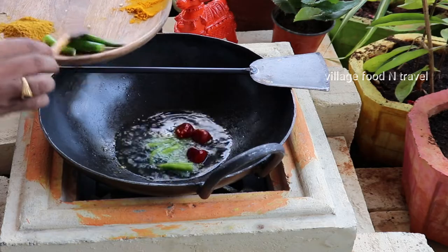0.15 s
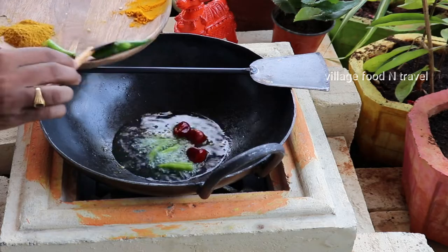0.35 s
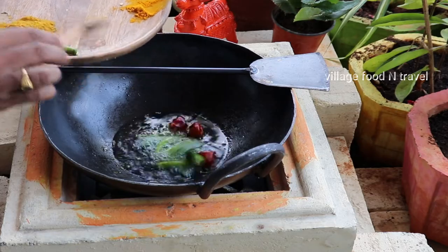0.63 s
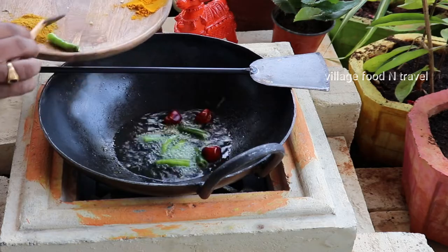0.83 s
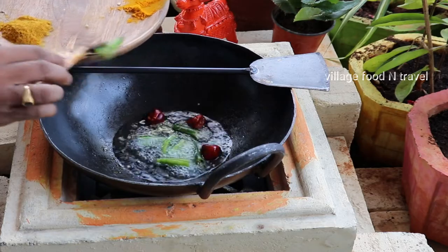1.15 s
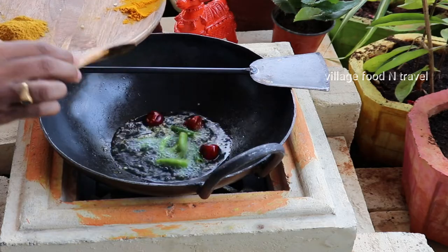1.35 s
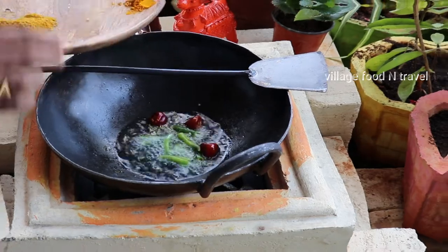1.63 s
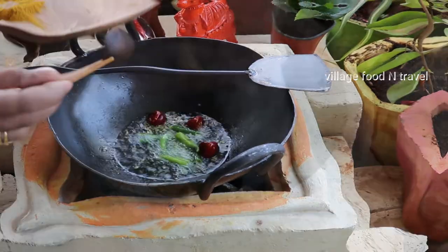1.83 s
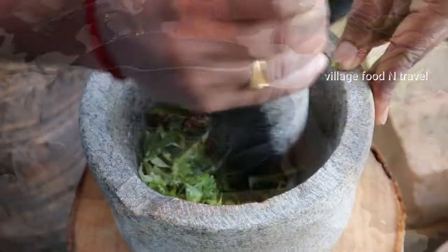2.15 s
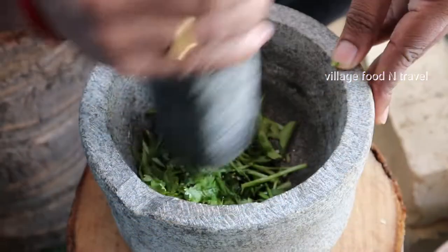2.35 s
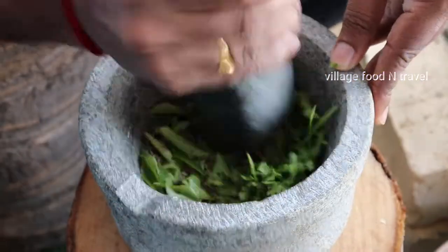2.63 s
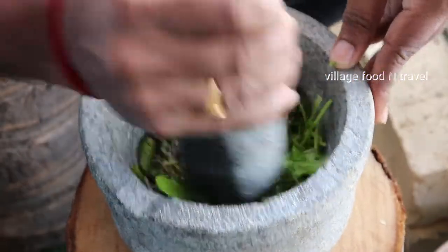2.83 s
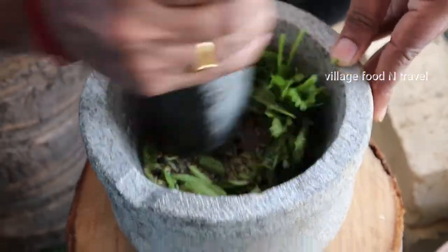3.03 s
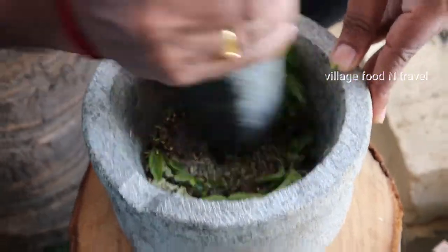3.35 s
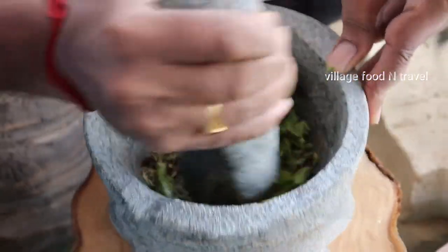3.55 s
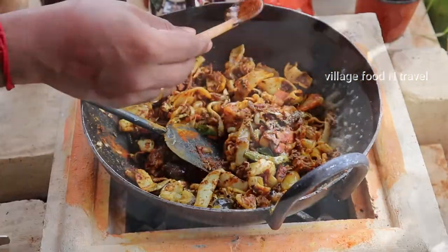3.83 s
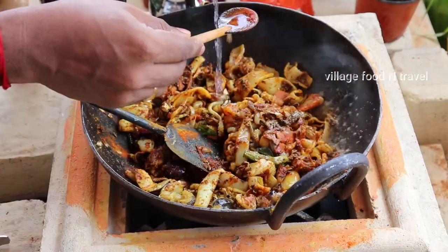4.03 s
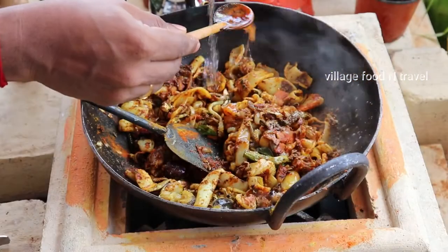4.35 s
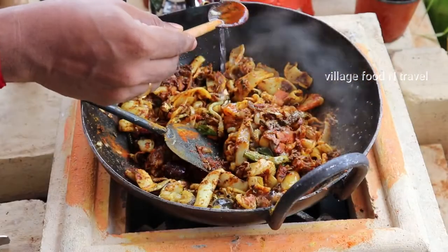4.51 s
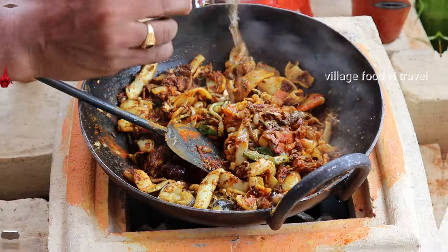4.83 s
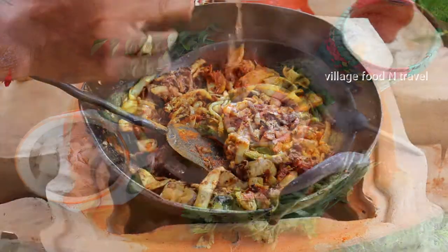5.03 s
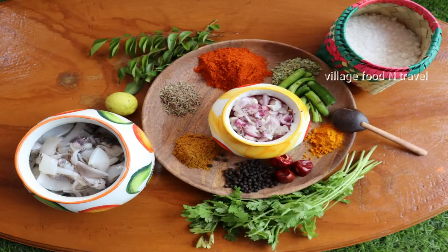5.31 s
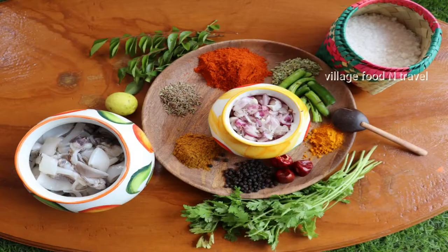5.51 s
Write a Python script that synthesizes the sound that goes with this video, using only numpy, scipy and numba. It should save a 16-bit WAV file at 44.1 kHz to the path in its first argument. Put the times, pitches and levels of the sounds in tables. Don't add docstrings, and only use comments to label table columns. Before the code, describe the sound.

Sharp oil spits over a fine sizzle, two wooden taps and short scrapes, with a low uneven engine far away. Around two seconds frying fades under regular mortar blows about every quarter to four tenths of a second, with leafy crunches, snaps and ringing stone. A loud, steady steaming hiss swells from a wet pan, then stops. Outdoor yard, light wind, close microphone overloading on the hardest hits.

```python
import sys
import numpy as np
from scipy import signal
from scipy.fft import rfft, irfft, next_fast_len
from scipy.io import wavfile
from numba import njit

SR = 44100
rng = np.random.default_rng(int(sys.argv[2]) if len(sys.argv) > 2 else 0)


def invert_db(x):
    u = np.asarray(x, float) / 20
    return 10 ** u


def output_pcm(signal):
    pcm = np.clip(np.atleast_2d(signal).T, -1, 1) * 32767
    wavfile.write(sys.argv[1], SR, np.round(pcm).astype(np.int16))


N = 250124
T = np.arange(N) / SR
FFT_N = next_fast_len(N)
HZ = np.maximum(np.fft.rfftfreq(FFT_N, 1 / SR), 1)
OCTAVES = [np.cos(np.pi / 2 * np.clip(np.log2(HZ / (30 * 2 ** k)), -1, 1)) ** 2 for k in range(10)]

# fade-in start in seconds, fade-out end in seconds.
PAN_SHOT, MORTAR_SHOT, STEAM_SHOT = (-1, 2.37), (1.8, 4.0), (3.6, 5.3245)
FRAME_S, DISSOLVE_S, DISSOLVE_POWER = 1 / 24, 0.42, 1.59
RING_S = .35
CALM_DB = 1.6

# frequency in Hz, side minus mid in dB.
SIDES = [(60, -13.5), (110, -11.5), (200, -10.5), (380, -12.5), (700, -10.5), (1290, -7), (2380, -6.5),
         (4400, -8), (8120, -4), (15000, -1)]

# start in seconds, length in seconds, level in dB.
GUSTS = [(1.865, 0.027, -43.5), (2.056, 0.079, -41), (2.204, 0.036, -42.5), (2.29, 0.41, -42),
         (2.932, 0.056, -47), (3.12, 0.013, -47), (3.4, 0.11, -53), (4.74, .04, -64)]

# time in seconds, level in dB.
ENGINE_LOAD = [
    (0.0, -40),
    (1.03, -33.5),
    (1.38, -35),
    (1.6, -32.5),
    (2.4, -60.5),
]
# frequency in Hz, width in Hz, level in dB.
EXHAUST = [(169.7, 35, 1), (287.2, 7.5, -12)]
# frequency in Hz, width in Hz, level in dB.
SILENCER = [(126.3, 29.5, -1.5)]

# start in seconds, length in seconds,
# level in dB, pitch in Hz.
HUMS = [(1.178, .012, -30, 960), (1.79, .02, -38.5, 298), (3.638, .015, -38, 900),
        (1.452, 0.019, -37.5, 680), (3.054, 0.015, -37.5, 700), (3.275, 0.068, -38.5, 477),
        (3.594, 0.19, -47, 388), (3.87, .025, -43, 545)]

# start in seconds, length in seconds, level in dB.
RUSTLES = [(2.263, 0.08, -47.5), (2.516, 0.018, -33), (2.599, 0.036, -26.5), (2.667, 0.089, -37),
           (2.813, 0.056, -33.5), (2.894, 0.028, -42.5), (2.938, 0.017, -32), (2.978, 0.044, -33.5),
           (3.043, 0.022, -34), (3.108, 0.012, -35.5), (3.173, 0.073, -40), (3.263, 0.051, -35.5),
           (3.357, 0.0091, -33), (3.394, 0.067, -40.5), (3.448, 0.056, -34.5), (3.531, 0.18, -40.5)]
# frequency in Hz, density in dB per Hz.
LEAF_COLOUR = [(1000, -14), (1800, -9), (2600, -4), (4500, -0.5), (7000, -5), (10000, -9), (15800, -26)]
# time in seconds, peak in dB, pitch in Hz.
SNAPS = [(2.6564, -17, 4000), (2.7165, -17, 4380), (2.953, -18, 4785), (3.001, -19, 3220),
         (3.054, -23, 5000), (3.0656, -23.5, 5000), (3.4775, -19.5, 2800), (3.4616, -15.5, 3570),
         (3.4694, -17, 4180), (2.8, -22, 4800), (3.4015, -24.5, 4070), (2.5884, -19.5, 3800),
         (3.6, -27, 4000), (3.4394, -24, 3100), (2.8, -18.5, 4230)]
# time in seconds, peak in dB, pitch in Hz.
SEEDS = [
    (2.1585, -22.5, 980),
    (3.4601, -21, 800),
]
# time in seconds, peak in dB, pitch in Hz.
LEAF_TICKS = [(2.7504, -27, 8500), (2.8185, -27, 9810), (3.0097, -31, 8500), (3.1168, -26, 9190),
              (3.1224, -28, 9040), (3.3024, -33, 8450), (3.4935, -24.5, 8300)]

# time in seconds, peak in dB.
TAPS = [
    (0.211, -17),
    (0.533, -13.5),
]
# start in seconds, length in seconds, level in dB.
SCRAPES = [(1.042, 0.013, -31.5), (1.065, 0.046, -36), (1.117, .01, -33.5), (1.159, .042, -30),
           (1.223, .018, -36), (1.279, .008, -32), (1.298, 0.012, -29.5)]
# start in seconds, length in seconds, level in dB.
SKIDS = [(0.242, .055, -37), (0.54, .045, -40.5), (1.035, .03, -34), (1.172, .03, -32),
         (1.273, .045, -32.5)]
# frequency in Hz, level in dB, t60 in seconds.
PLATE = [(872, 0, .085), (950, -7, .07), (1490, -7, .1), (1771, -7, .12), (1880, -5, .18), (2008, -9, .18),
         (2580, -7, .14), (2800, -9, .09)]

# time in seconds, level in dB.
OIL = [(0, -30.5), (.09, -33.5), (.17, -36.5), (.26, -34), (.33, -35.5), (.45, -33), (.58, -29), (.66, -30),
       (.79, -31), (.87, -27.5), (.98, -28), (1.1, -30), (1.25, -28.5), (1.32, -28), (1.5, -29.5),
       (1.76, -30.5), (2.07, -33), (2.4, -36)]
# frequency in Hz, density in dB per Hz.
OIL_COLOUR = [(240, -39), (400, -7.5), (654, -3.5), (729, -8), (1070, -6), (2310, -4.5), (2950, 0),
              (4980, 2), (9080, -4.5), (15800, -21)]
# time in seconds, peak in dB, pitch in Hz.
TICKS = [(0.1088, -8, 8000), (0.2124, -7, 2060), (0.2324, -10, 5900), (0.4657, -10, 2090),
         (0.5342, -2, 2800), (0.8778, -1, 3350), (0.8978, -4.5, 3860), (0.9325, -7, 3700),
         (1.0216, -6.5, 2920), (1.1273, -6, 5370), (1.3099, 0, 4000), (1.3155, 0, 4300), (1.6599, -6, 2500),
         (1.714, -5, 2400), (1.7449, -12.5, 3030), (1.8235, -3.5, 3800), (1.912, -10.5, 3230),
         (1.94, -8, 5340), (1.9889, -14, 4560), (2.0059, -16.5, 3500), (2.2044, -17, 2920)]
# time in seconds, peak in dB, pitch in Hz.
PINGS = [(0.0179, -6, 3220), (0.0282, -10, 4140), (0.5037, -9, 4680), (0.702, -7.5, 4580),
         (0.7107, -6, 3000), (0.752, -5.5, 6070), (0.8143, -2, 5030), (0.8647, -11.5, 4070),
         (1.052, -13.5, 2620), (1.2024, -6.5, 4730), (1.3704, -4.5, 5160), (1.4117, -7, 6300),
         (1.506, -4, 3950), (1.5343, -9, 7000), (1.5421, -9.5, 6800), (1.6157, -4, 3740),
         (1.6837, -13, 2820), (1.699, -7.5, 3900), (1.7774, -8.5, 3860), (1.7906, -5, 6400),
         (1.8951, -5, 4020), (1.9062, -10, 2900), (1.9314, -18.5, 2440), (1.964, -8, 3950),
         (2.0746, -10, 4020), (2.1021, -13.5, 4080), (2.1218, -17, 3500)]
# time in seconds, peak in dB, pitch in Hz.
SPLATS = [(0.0564, -9.5, 2040), (0.0614, -3, 4500), (0.3448, -9, 2360), (0.3505, -0.5, 4200),
          (0.4321, -4.5, 3370), (0.5706, -12, 3500), (0.5763, 2.5, 2210), (1.0696, -8.5, 6100),
          (1.2159, -2, 2980), (1.2898, -8.5, 2650), (1.4615, -8.5, 5130), (1.566, -10, 5000),
          (2.159, -16, 2800)]
# time in seconds, peak in dB, pitch in Hz.
SPITS = [(0.3264, -19, 7980), (0.3735, -26.5, 7560), (0.3812, -21.5, 7500), (0.6155, -17, 4490),
         (0.833, -7, 5110), (0.9712, -12.5, 3350), (1.1058, -24, 3596), (1.2706, -18.5, 2710),
         (1.6368, -13.5, 5270), (2.2463, -24, 5000)]
# time in seconds, peak in dB, pitch in Hz.
DOTS = [(.0688, -17, 4560), (.0755, -16.5, 4330), (.1405, -18.5, 2620), (.4718, -14, 1900),
        (.9854, -10, 7720), (1.1328, -10, 5200), (1.8577, -16.5, 4260), (2.1848, -25.5, 5850),
        (2.1955, -28, 2410), (.1189, -13.5, 6700), (.6646, -16, 3800), (.6705, -16.5, 2650),
        (.6875, -12, 3970), (.7756, -13, 4020), (.8844, -9, 5000), (.939, -11, 4240), (1.016, -7.5, 5980),
        (1.0735, -18, 3400), (1.0989, -13, 7100), (1.146, -16.5, 2280), (1.3055, -11.5, 4780),
        (1.3642, -8, 5480), (1.4071, -10.5, 6630), (1.4192, -13.5, 3830), (1.5009, -7, 4950),
        (1.5688, -10, 3170), (1.6245, -12, 3490), (1.65, -5, 6180), (1.746, -10, 4870),
        (1.7805, -7.5, 3080), (1.7971, -9.5, 3960), (1.9135, -8.5, 3290), (1.9966, -13.5, 4650),
        (2.1118, -16.5, 3800)]
# time in seconds, peak in dB, pitch in Hz.
SPARKS = [(0.0238, -31, 7500), (0.0238, -25.5, 8600), (0.0363, -22.5, 8490), (0.0752, -19.5, 9920),
          (0.1087, -22, 8200), (0.1585, -25.5, 7990), (0.2129, -32.5, 8420), (0.2244, -26.5, 7810),
          (0.2503, -30.5, 8940), (0.3062, -29, 10500), (0.3237, -27.5, 7910), (0.3336, -27.5, 7810),
          (0.35, -23, 8000), (0.4309, -16.5, 9960), (0.467, -19, 7530), (0.4978, -28.5, 8200),
          (0.5317, -24.5, 7580), (0.575, -16, 9700), (0.6155, -34, 7500), (0.6157, -16, 8590),
          (0.635, -21.5, 8920), (0.7013, -26.5, 11100), (0.7023, -26.5, 8440), (0.7093, -21.5, 8940),
          (0.7497, -23, 7500), (0.8327, -11.5, 9360), (0.9448, -22.5, 8700), (0.9847, -21.5, 7690),
          (1.0515, -27.5, 7610), (1.0854, -23, 8690), (1.1047, -16, 8730), (1.1463, -21, 7740),
          (1.1596, -16.5, 8460), (1.1977, -21.5, 9410), (1.2545, -22, 8650), (1.2715, -13, 8510),
          (1.3394, -25.5, 7540), (1.3912, -22, 7560), (1.4441, -21, 8770), (1.4965, -31.5, 9620),
          (1.4965, -20, 8090), (1.5404, -14.5, 8720), (1.5898, -25, 8510), (1.6297, -22.5, 8640),
          (1.6492, -25.5, 7910), (1.6816, -26, 7630), (1.7155, -26, 7730), (1.8238, -17, 8550),
          (1.8457, -28.5, 7980), (1.8692, -25, 8800), (1.9235, -23, 7760), (1.943, -22, 7790),
          (1.9889, -24, 8610), (2.0238, -18.5, 7770), (2.0842, -27.5, 8450), (2.1575, -21.5, 11000)]
# ring in cycles, bright crack in dB, low plop in dB.
TICK, PING, SPLAT = (1, -22, -39), (4.2, -15, -36.5), (1.3, -11, -3.5)
SPIT, SNAP = (1.1, -1.6, -16.5), (1.9, -16, -8)
DOT, SPARK = (1.8, -14, -30), (1.0, -29.5, -40)

# frequency in Hz, density in dB per Hz.
STEAM_COLOUR = [(120, 16), (200, -48), (366, -15.5), (423, -29.5), (455, -11.5), (668, -9.5), (848, -9),
                (1180, -2.5), (2080, 3.5), (2450, 10.5), (7600, -1.5), (12700, -14.5), (15800, -25)]
# frequency in Hz, width in Hz, lift in dB.
PAN = [(680, 14, 8.5), (1200, 110, 1), (1505, 35, 4), (1823, 13, 9.5), (2430, 690, -5.5)]
# start in seconds, length in seconds, level in dB, pitch in Hz.
SURGES = [(4.12, 0.3, -8, 4450), (4.168, 0.03, -4.5, 1720), (4.704, 0.38, -10, 2524),
          (4.699, 0.46, -5, 1176), (4.5, 0.091, -12, 3000), (4.85, 0.042, -15, 3430)]

# time in seconds, then thud, mortar ring, pestle chime and leaf crunch in dB.
BLOWS = [
    (2.026, -4, -35.5, -52, -9),
    (2.258, 0.5, -31.5, -46.5, -10),
    (2.521, -24, -39, -57, -8.5),
    (2.759, -11.5, -1, -24, -15),
    (3.134, -13.5, -2, -10, -21.5),
    (3.531, -12, -7, -25, -21),
    (3.919, -22.5, -63, -76, -64),
]
# frequency in Hz, level in dB, t60 in seconds.
THUD = [(161, -14.5, 0.039), (277, -1.5, 0.038), (388, 3.5, 0.029), (531, -2.5, 0.032), (700, -3.5, 0.018),
        (893, 2.5, 0.021), (996, -2, .012), (1480, -12, 0.01)]
# frequency in Hz, level in dB, t60 in seconds.
STONE = [(1040, -12, .04), (1250, -6, .04), (1390, -4, .04), (1555, -1, .045), (1679, 0, .055),
         (1790, -5, .045), (1885, -2, .05), (2030, -6, .07), (2700, -11, .01), (3050, -9, .01),
         (4800, -10, .01), (5500, -10, .01), (6379, -17, .035)]
# frequency in Hz, level in dB, t60 in seconds.
KNOCK = [(830, -8, .016), (1250, -5, .013), (1520, -3, .014), (1810, 0, .014), (2650, -6, .011),
         (5200, -12, .009)]
# frequency in Hz, level in dB, t60 in seconds.
MORTAR = [(1070, -10, .15), (1205, -8, .12), (1365, -10, .3), (1420, -11, .25), (1550, -3, .17),
          (1693, 0, .14), (1820, -7, .25), (1884, -9, .17), (2010, -7, .24), (2218, -16, .25)]
# frequency in Hz, level in dB, t60 in seconds.
BLOCK = [(165, -10, .35), (223, -7, .3), (291, 0, .3), (377, -4, .25), (515, -6, .25), (700, -12, .3),
         (759, -13, .3), (872, -11, .22)]
# frequency in Hz, level in dB, t60 in seconds.
CHIME = [(3967, 0, .125), (4059, -14, .12)]
# frequency in Hz, level in dB, t60 in seconds.
AFTER_CHIME = [(3977, 0, .4), (4026, -6, .2)]
# time in seconds, level in dB.
AFTER_CHIMES = [
    (2.762, -23.5),
    (3.137, -25),
    (3.534, -34),
]
# time in seconds, level in dB.
SOFT_BLOWS = [
    (2.522, -20),
]
# frequency in Hz, level in dB, t60 in seconds.
STUMP = [(190, -8.5, 0.058), (288, -2, 0.035), (396, -0.5, 0.048)]
# time in seconds, level in dB.
BOUNCES = [
    (2.7765, -12),
    (3.162, -18),
]
# time in seconds, level in dB.
BOOMS = [
    (3.134, -25.5),
    (2.759, -34.5),
]
# frequency in Hz, level in dB, t60 in seconds.
GROUND = [(62, -2, 0.074), (111.7, 0, .07)]


def curve(table, column, outside_db=-120):
    rows = np.array(table, float)
    return np.interp(T, rows[:, 0], rows[:, column], left=outside_db, right=outside_db)


def gain_of(points):
    rows = np.array(points, float)
    return invert_db(np.interp(np.log(HZ), np.log(rows[:, 0]), rows[:, 1]))


def colour(x, gain):
    y = irfft(rfft(x, FFT_N) * gain, FFT_N)[..., :N]
    return y / np.sqrt(np.mean(y ** 2))


def bandpass(x, low_hz, high_hz):
    sos = signal.butter(2, [low_hz, min(high_hz, 20000)], "bandpass", fs=SR, output="sos")
    return signal.sosfilt(sos, x)


def walk(rate_hz, spread_db):
    steps = rng.standard_normal(512)
    return np.interp(T * rate_hz, np.arange(len(steps)), invert_db(spread_db * steps))


def wide(gain, flicker_db, rate_hz, bands):
    mid_side = np.array([np.ones_like(HZ), gain_of(SIDES)])
    spec = rfft(rng.standard_normal((2, N)), FFT_N) * gain * mid_side
    mid, side = sum(irfft(spec * octave, FFT_N)[:, :N] * walk(rate_hz, flicker_db) for octave in bands)
    return np.array([mid + side, mid - side]) / np.sqrt(np.mean(mid ** 2))


@njit
def grains(n, start, hz, cycles, left, right, lag):
    out = np.zeros((2, n + 4096))
    for k in range(len(start)):
        p = np.exp(2j * np.pi * hz[k] / SR - hz[k] / cycles[k] / SR)
        z = 1 + 0j
        for i in range(min(int(6 * cycles[k] / hz[k] * SR), 4000)):
            z *= p
            out[0, start[k] + i] += left[k] * z.imag
            out[1, start[k] + i + lag[k]] += right[k] * z.imag
    return out[:, :n]


def crackle(start_s, end_s, count, low_hz, high_hz, cycles, spread_db):
    when, pitch, rarity, place, shape = rng.random((count, 5)).T
    size = invert_db(-spread_db * np.log(1 - .995 * rarity))
    start = ((start_s + (end_s - start_s) * when) * SR).astype(int)
    hz = low_hz * (high_hz / low_hz) ** pitch
    lag = (3 * shape).astype(int)
    out = grains(N, start, hz, cycles * (.5 + shape), size * (.5 + place), size * (1.5 - place), lag)
    out = bandpass(out, low_hz / 2, 22000)
    return out / np.sqrt(np.sum(out ** 2) / 2 / (end_s - start_s) / SR)


def ring(modes, length_s, jitter_db):
    t = np.arange(int(length_s * SR)) / SR
    out = np.zeros(len(t))
    for k, (hz, db, t60) in enumerate(modes):
        level = (-1) ** k * invert_db(db + jitter_db * rng.standard_normal())
        out += level * np.sin(2 * np.pi * hz * t) * 1000. ** (-t / t60)
    return out / np.abs(out).max()


def shudder(low_hz, high_hz, t60, db):
    t = np.arange(int(RING_S * SR)) / SR
    noise = rng.standard_normal((2, len(t)))
    tail = bandpass(bandpass(noise[0] + .5 * noise, low_hz, high_hz), low_hz, high_hz)
    return invert_db(db) * tail * 1000. ** (-t / t60) * (1 - np.exp(-t / .005))


def add(out, s, sound):
    i = int(s * SR)
    out[..., i:i + sound.shape[-1]] += sound[..., :N - i]


def pan(db):
    return invert_db(np.array([[db], [-db]]) / 2)


def pops(table, kind, pan_db, ring_s, crack_s, spray_s, spray_db):
    out, t = np.zeros((2, N)), np.arange(1024) / SR
    cycles, bright_db, plop_db = kind
    decay = np.exp(-t / ring_s) + invert_db(spray_db) * np.exp(-t / spray_s)
    for s, db, hz in table:
        noise = rng.standard_normal((5, len(t)))
        push = (noise[0] + 0.53 * noise[:2] + 3 * (t == 0)) * decay
        pole = np.exp(-hz / max(cycles, .5) / SR)
        body = signal.lfilter([1, 0, -1], [1, -2 * pole * np.cos(2 * np.pi * hz / SR), pole ** 2], push)
        body = bandpass(body, hz / 4, hz * 1.9)
        crack = bandpass((noise[2] + 0.48 * noise[2:4]) * t * np.exp(-t / crack_s), 2600, 6900)
        crack = bandpass(crack, 1500, 8800)
        plop = bandpass(noise[4] * np.exp(-t / 0.00041), 530, 1800)
        parts = (body, 0), (crack, bright_db + 7), (plop, plop_db - 7.5)
        burst = sum(invert_db(part_db) * part / np.abs(part).max() for part, part_db in parts)
        add(out, s, burst * invert_db(db) * pan(pan_db))
    return out


def shot(start, end):
    frames = np.minimum(np.ceil((T - start) / FRAME_S), np.ceil((end - T) / FRAME_S))
    return np.clip(frames * FRAME_S / DISSOLVE_S, 0, 1) ** DISSOLVE_POWER


def stroke(s, length_s, db, rise_s, fall_s):
    return invert_db(db) * np.exp(-np.maximum(s - T, 0) / rise_s - np.maximum(T - s - length_s, 0) / fall_s)


def strokes(table, rise_s, fall_s):
    return sum(stroke(*row, rise_s, fall_s) for row in table)


def walls(x, t60, dull_hz, wet_db):
    t = np.arange(int(.5 * SR)) / SR
    noise = rng.standard_normal((2, len(t)))
    tail = noise[0] + 0.88 * noise[1] * np.array([[1], [-1]])
    tail = tail * 1000. ** (-t / t60) * np.clip(t / 0.0094, 0, 1)
    tail = signal.sosfilt(signal.butter(2, min(dull_hz, 20000), fs=SR, output="sos"), tail)
    tail = tail / np.sqrt(np.sum(tail[0] ** 2))
    return x + invert_db(wet_db) * signal.fftconvolve(x, tail, axes=1)[:, :N]


def air():
    wind_gain = gain_of([(10, -13.0), (30, 2.0), (60, -3.0), (110, -3.5), (250, -17.0), (600, -57.0)])
    yard_gain = gain_of([(80, 0.0), (200, 6), (700, -6.5), (2000, -13.0), (8000, -25.5), (16000, -36.0)])
    wind = wide(wind_gain, flicker_db=2 * CALM_DB, rate_hz=16, bands=OCTAVES[:4])
    yard = wide(yard_gain, flicker_db=CALM_DB, rate_hz=12.0, bands=OCTAVES[1:])
    centre = wind.mean(axis=0)
    wind = centre + .7 * (wind - centre)
    # (wind dB, yard dB)
    shots = (PAN_SHOT, (-60.5, -44)), (MORTAR_SHOT, (-55.5, -46.5)), (STEAM_SHOT, (-56, -50))
    calm, murmur = sum(invert_db(np.array(db))[:, None] * shot(*span) for span, db in shots)
    gusts = strokes(GUSTS, rise_s=.022, fall_s=.022)
    return wind * (calm + gusts), yard * murmur, wind


def returning_wind(breeze):
    gain = gain_of([(25, -21.5), (50, 8), (120, -6), (2000, 8)])
    return colour(breeze, gain) * invert_db(-76) * np.clip((T - 5.625) / 0.043, 0, 1)


def pipe(resonances):
    return sum(invert_db(db) * (-1) ** k / (1 + 1j * (HZ - hz ** 2 / HZ) / width_hz) ** 2
               for k, (hz, width_hz, db) in enumerate(resonances))


def engine():
    idle_hz, gain_hz_per_s, first_turn = 20.22, 2.45, .03
    turns = idle_hz * T + gain_hz_per_s * T ** 2 / 2 + first_turn
    uneven = .025 * np.log(walk(20, 8))
    firings = np.diff(np.floor(turns + uneven), prepend=-1) * walk(22, 1.8)
    pulses = firings + 0.005 * rng.standard_normal(N)
    low = colour(pulses, pipe(SILENCER)) * invert_db(SILENCER[0][2] - 5.5 * T)
    exhaust = (colour(pulses, pipe(EXHAUST)) - low) * invert_db(curve(ENGINE_LOAD, 1)) * shot(*PAN_SHOT)
    throb = invert_db(-51.5) * np.sin(2 * np.pi * 48 * np.cumsum(walk(12, .3)) / SR) * walk(9, 2.5)
    throb = throb * np.clip((MORTAR_SHOT[0] - T) / FRAME_S, 0, 1)
    return (exhaust + throb) * pan(1.4)


def grind():
    gain = gain_of([(150, -30.5), (330, -4.5), (1000, -3.5), (2200, -8.0), (5000, -51.0)])
    edge_s = .012
    rumble = wide(gain, flicker_db=2.5, rate_hz=23, bands=OCTAVES[2:7])
    out = rumble * stroke(2.6, 1.08, -41, edge_s, edge_s)
    noise = rng.standard_normal((2, N))
    for s, length_s, db, hz in HUMS:
        hum = colour(noise[0] + .4 * noise, 1 / (1 + ((HZ - hz) / (.07 * hz)) ** 2))
        out = out + stroke(s, length_s, db - 2, edge_s, edge_s) * hum
    return out


def leaves():
    gain = gain_of(LEAF_COLOUR)
    grit = crackle(2.2, 3.7, count=3500, low_hz=2340, high_hz=12100, cycles=0.74, spread_db=2)
    brush = wide(gain, flicker_db=3, rate_hz=46, bands=OCTAVES[5:])
    rustle = 0.23 * colour(grit, gain ** 0.5) + invert_db(-3.5) * brush
    drag = strokes(RUSTLES, rise_s=0.0094, fall_s=0.011)
    snaps = pops(SNAPS, SNAP, pan_db=0.294, ring_s=.00019, crack_s=.0002, spray_s=.006, spray_db=-11.0)
    seeds = pops(SEEDS, SPLAT, pan_db=0, ring_s=.0003, crack_s=.0002, spray_s=.004, spray_db=-6.0)
    return rustle * drag * invert_db(3.5) + snaps + seeds


def plate():
    out = np.zeros(N)
    for s, db in TAPS:
        add(out, s, invert_db(db) * ring(PLATE, .2, jitter_db=0.7))
    slips = (rng.random(N) < .03) * rng.standard_normal(N)
    rubbed = signal.fftconvolve(slips, ring(PLATE, 0.22, jitter_db=0))[:N]
    scrape = bandpass(rubbed, 650, 1600)
    skid = bandpass(bandpass(rubbed, 1500, 3200), 1500, 3200)
    squeak = invert_db(-1) * np.sin(2 * np.pi * 870 * np.cumsum(walk(59.95, .3)) / SR) * walk(70, 2.8)
    edges = dict(rise_s=0.0028, fall_s=0.012)
    out = out + skid / skid.std() * strokes(SKIDS, **edges)
    return out + (0.7 * scrape / scrape.std() + squeak) * strokes(SCRAPES, **edges)


def sparks():
    rows = [(s + .0007, db + 5, hz) for s, db, hz in SPARKS + LEAF_TICKS]
    return pops(rows, SPARK, pan_db=-2.5, ring_s=.00018, crack_s=.0001, spray_s=.004, spray_db=-13)


def frying():
    gain = gain_of(OIL_COLOUR)
    fizz = crackle(0, 4.4, count=5000, low_hz=1486, high_hz=12100, cycles=0.88, spread_db=8)
    spatter = crackle(0, 2.35, count=1300, low_hz=2287, high_hz=10500, cycles=3.0, spread_db=4.2)
    hiss = wide(gain, flicker_db=2.5, rate_hz=27, bands=OCTAVES[4:])
    bed = invert_db(-8) * spatter + invert_db(-6.5) * colour(fizz, gain ** 1.5) * 0.27 + invert_db(-4.0) * hiss
    kinds = (TICKS, TICK), (PINGS, PING), (SPLATS, SPLAT), (SPITS, SPIT), (DOTS, DOT)
    bursts = sum(pops(rows, kind, pan_db=-1.5, ring_s=.0007, crack_s=.0002, spray_s=.011, spray_db=-20.0)
                 for rows, kind in kinds)
    return bed * invert_db(curve(OIL, 1) + 3.5) * shot(*PAN_SHOT), bursts


def steam():
    lift_db = sum(db / (1 + ((HZ - hz) / width_hz) ** 2) for hz, width_hz, db in PAN)
    bowl = gain_of(STEAM_COLOUR) * invert_db(lift_db)
    low = 1 / (1 + (HZ / 3000) ** 4)
    since_s = T - STEAM_SHOT[0]
    boil = wide(bowl * low, flicker_db=CALM_DB / 2, rate_hz=27, bands=OCTAVES[3:8])
    boil = boil * invert_db(np.minimum(-10.5 + 6 * since_s, 0))
    bubbles = crackle(4.0, 5.36, count=14000, low_hz=967, high_hz=11100, cycles=2.0, spread_db=4.2)
    jet = invert_db(-2) * wide(bowl * (1 - low), flicker_db=1.0, rate_hz=16, bands=OCTAVES[6:])
    jet = jet + invert_db(-11.5) * colour(bubbles, bowl ** .5) * .5
    jet = jet * invert_db(np.minimum(-4.5 + 8.5 * since_s, 0))
    out = boil + jet
    surges = sum(stroke(s, length_s, db, .073, .073) * bandpass(boil + jet, hz / 1.11, hz * 1.11)
                 for s, length_s, db, hz in SURGES)
    return (out + surges) * invert_db(-18.5) * shot(*STEAM_SHOT)


def pestle():
    out, t = np.zeros((2, N)), np.arange(1024) / SR
    rough_db, knock_db, lead_s = 2.5, 10, 0.019
    for s, thud_db, stone_db, chime_db, crunch_db in BLOWS:
        stone = ring(STONE, RING_S, rough_db) + invert_db(-6) * ring(MORTAR, RING_S, rough_db)
        stone = stone + shudder(1350, 2300, t60=0.34, db=-13) + invert_db(knock_db) * ring(KNOCK, RING_S, 0)
        side = invert_db(knock_db - 11) * np.roll(ring(STONE, RING_S, rough_db), 7) * np.array([[1], [-1]])
        stone = invert_db(stone_db) * (stone + side)
        thud = ring(THUD, RING_S, 0) + invert_db(-14) * ring(BLOCK, RING_S, 2)
        thud = invert_db(thud_db) * (thud + shudder(142.5, 948, t60=0.45, db=-11.5))
        add(out, s, bandpass(thud + stone * pan(2.6), 100, 15000))
        add(out, s + .003, invert_db(chime_db) * ring(CHIME, RING_S, 0))

        noise = rng.standard_normal((2, len(t)))
        squeeze = np.exp(-np.abs(t - lead_s) / np.where(t < lead_s, .002, .0018))
        crunch = bandpass(noise[0] + .5 * noise, 2900, 9000) * squeeze
        add(out, s - lead_s - .002, invert_db(crunch_db + 1.0) * crunch)
        chip = bandpass(noise[1] + .5 * noise[::-1], 2400, 13000) * np.exp(-t / .001)
        add(out, s, invert_db(stone_db - 9) * chip)

    stump = ring(STUMP, RING_S, 0) + shudder(128, 560, t60=0.1, db=-1.5)
    extras = ((AFTER_CHIMES, ring(AFTER_CHIME, RING_S, 0)), (BOOMS, ring(GROUND, RING_S, 0)),
              (BOUNCES, ring(KNOCK, RING_S, 0)), (SOFT_BLOWS, stump))
    for rows, body in extras:
        for s, db in rows:
            add(out, s, invert_db(db) * body)
    return out


def scene():
    wind, yard, breeze = air()
    bed, bursts = frying()
    near = walls(bursts + sparks() + plate(), t60=.07, dull_hz=9000, wet_db=-13)
    mortar = walls(pestle(), t60=0.49, dull_hz=5100, wet_db=-22)
    mix = wind + yard + engine() + grind() + leaves() + bed + near + steam() + mortar
    sound = np.clip(mix, -.99, .99)
    return sound * (T < STEAM_SHOT[1]) + returning_wind(breeze)


def top_cut(x):
    return signal.sosfilt(signal.butter(12, 15950, fs=SR, output="sos"), x)


def record(dry):
    return top_cut(dry)


dry = scene()
out = record(dry)
output_pcm(out)
```